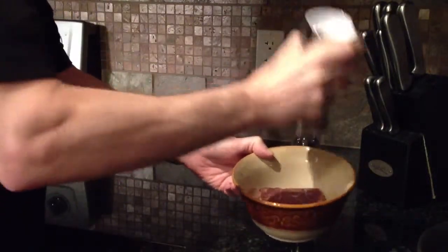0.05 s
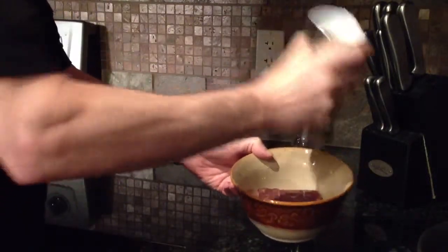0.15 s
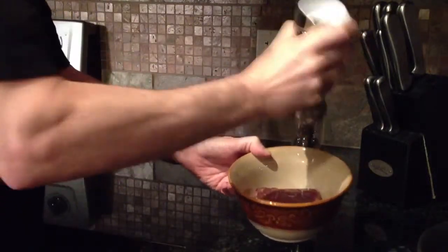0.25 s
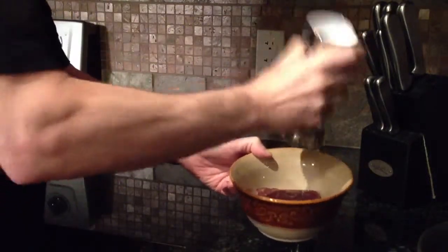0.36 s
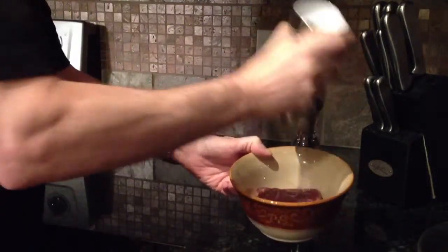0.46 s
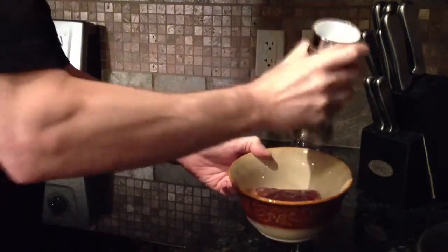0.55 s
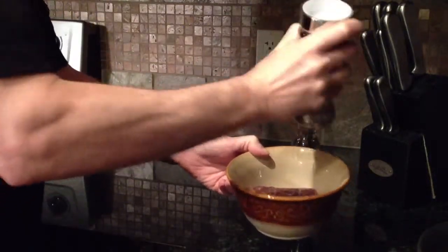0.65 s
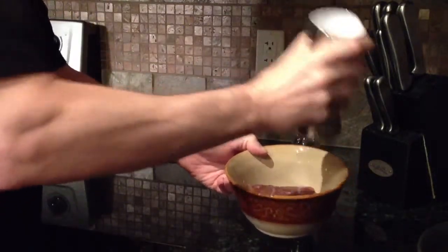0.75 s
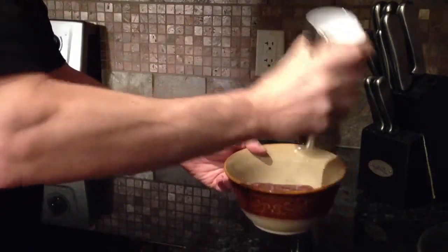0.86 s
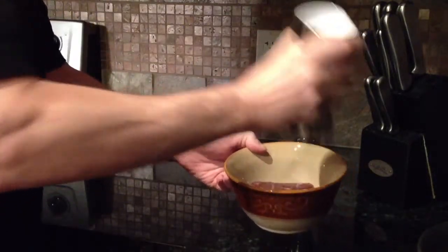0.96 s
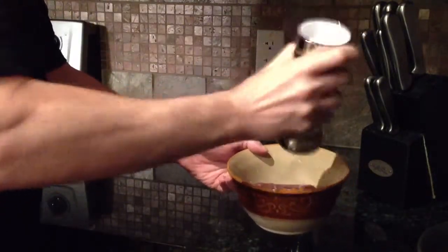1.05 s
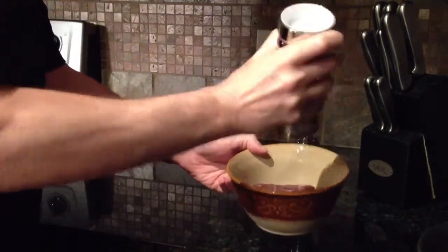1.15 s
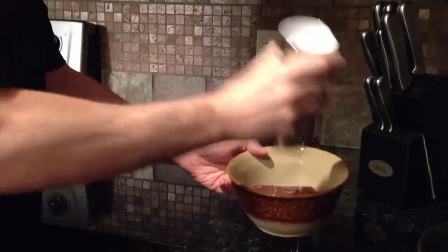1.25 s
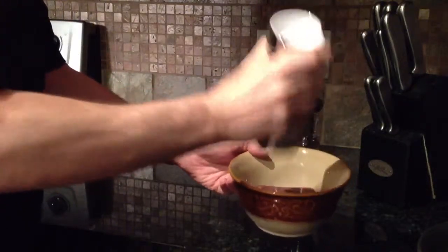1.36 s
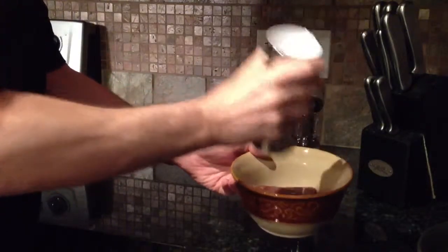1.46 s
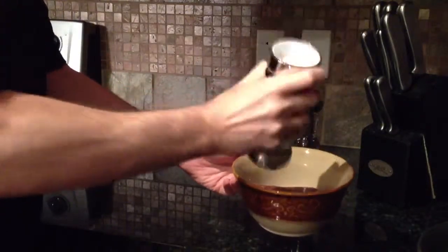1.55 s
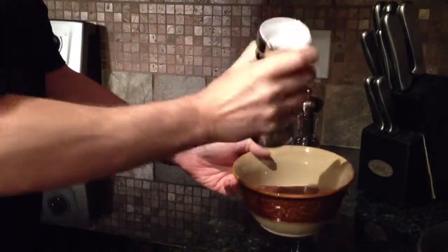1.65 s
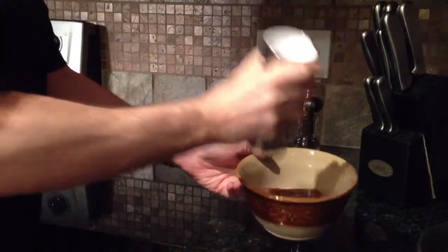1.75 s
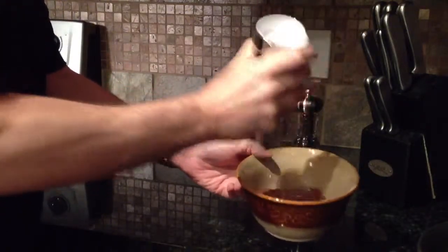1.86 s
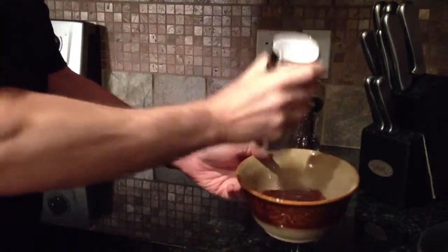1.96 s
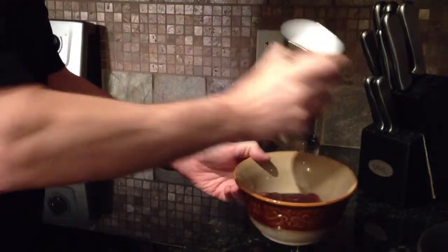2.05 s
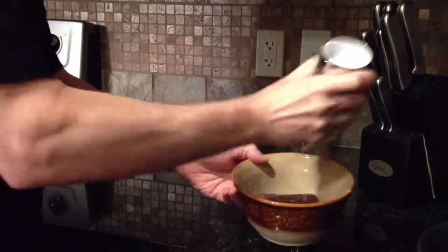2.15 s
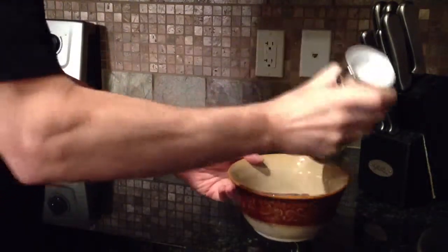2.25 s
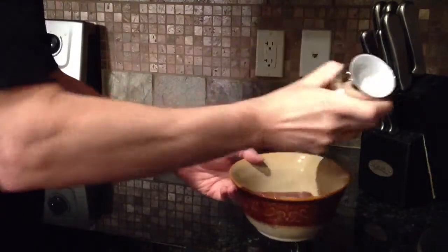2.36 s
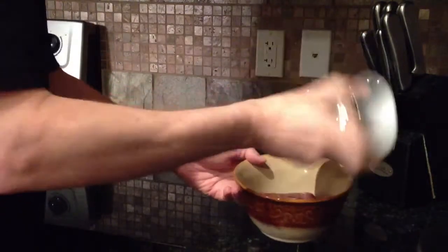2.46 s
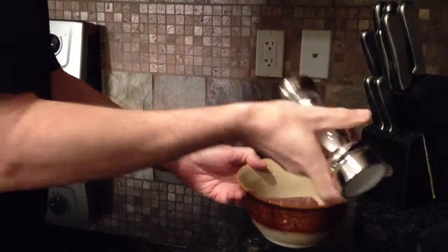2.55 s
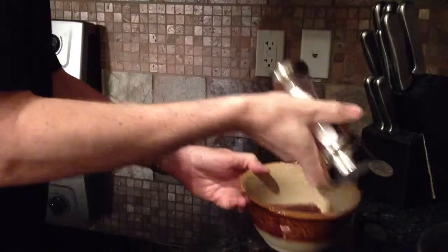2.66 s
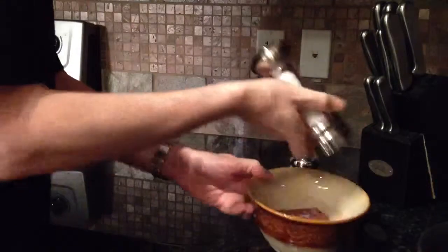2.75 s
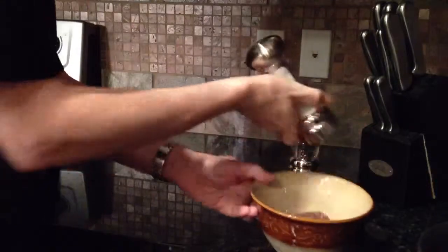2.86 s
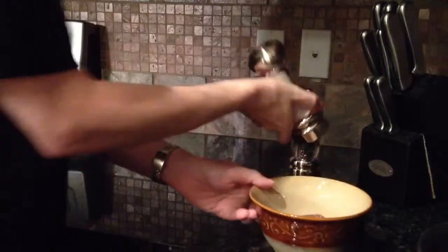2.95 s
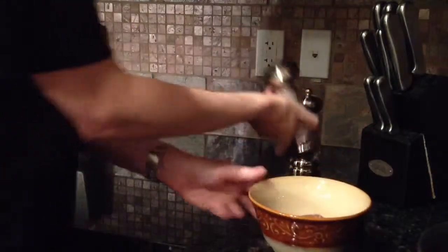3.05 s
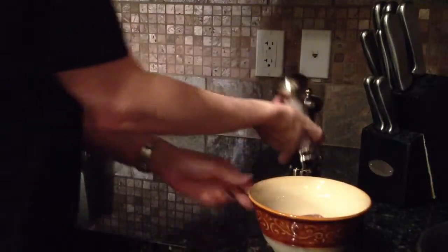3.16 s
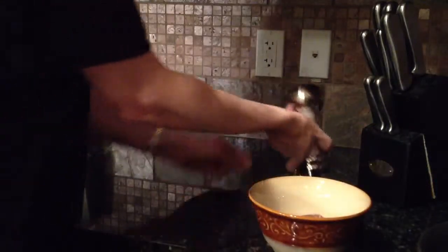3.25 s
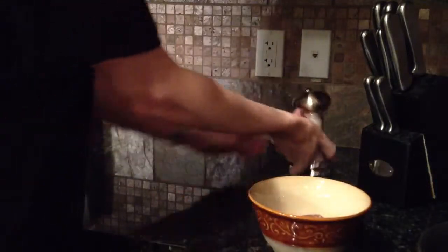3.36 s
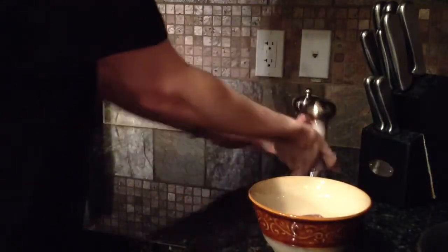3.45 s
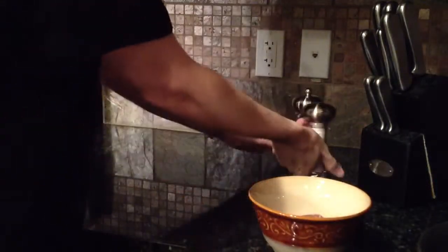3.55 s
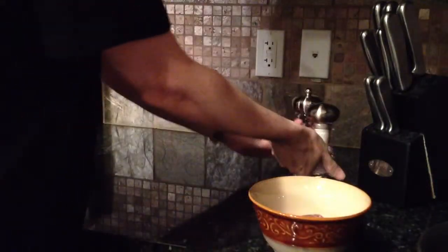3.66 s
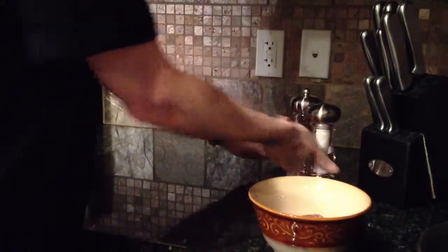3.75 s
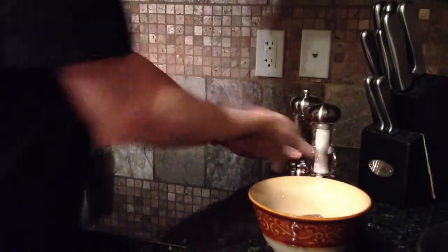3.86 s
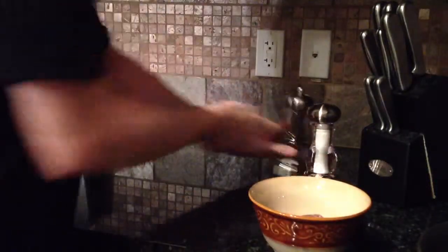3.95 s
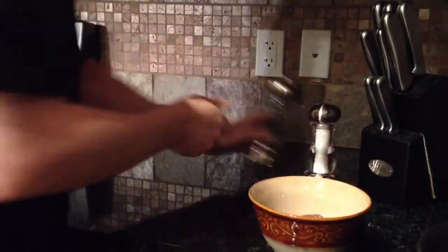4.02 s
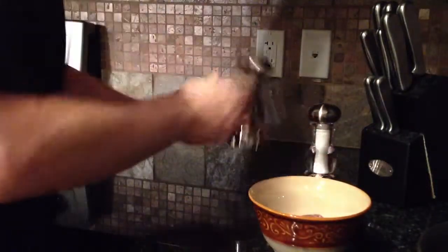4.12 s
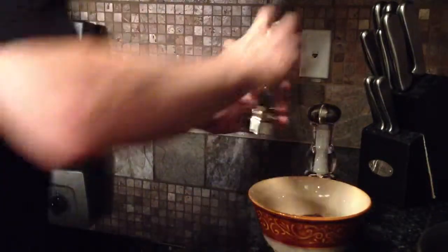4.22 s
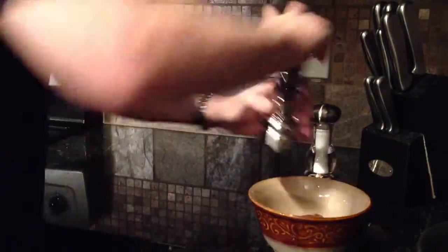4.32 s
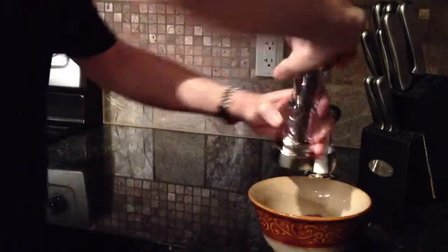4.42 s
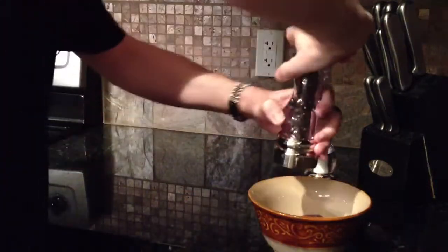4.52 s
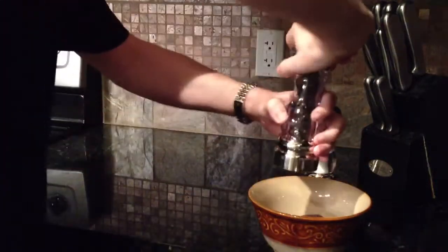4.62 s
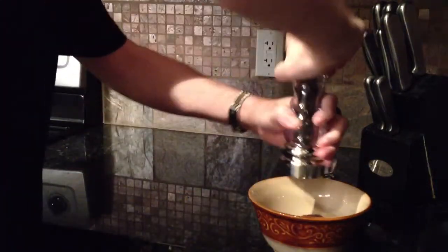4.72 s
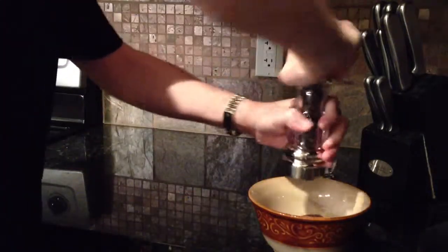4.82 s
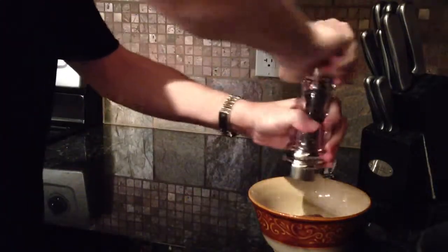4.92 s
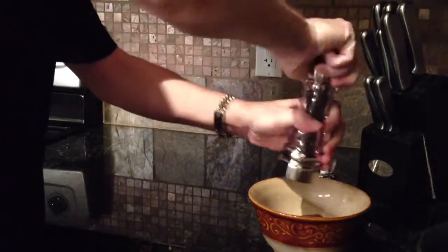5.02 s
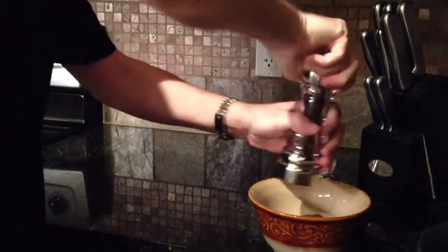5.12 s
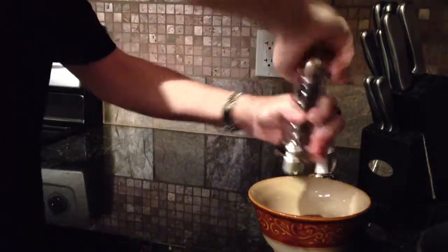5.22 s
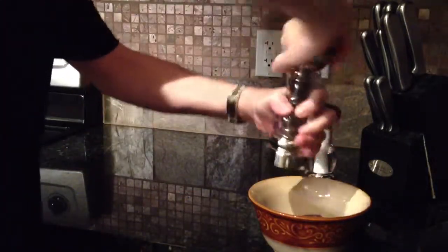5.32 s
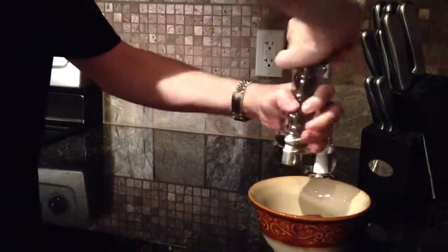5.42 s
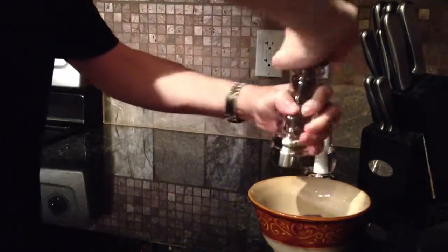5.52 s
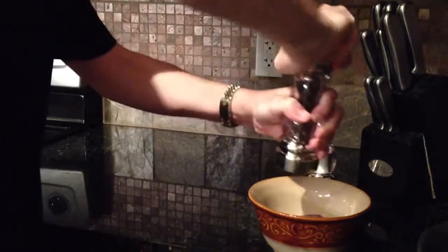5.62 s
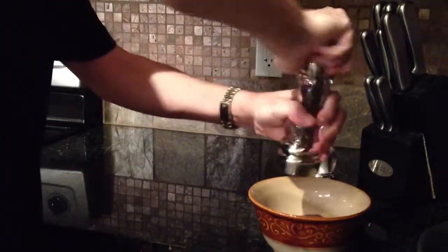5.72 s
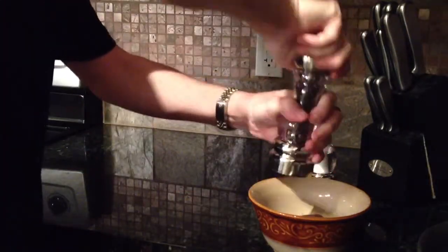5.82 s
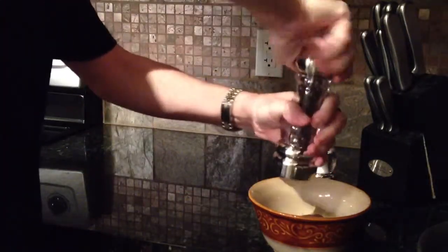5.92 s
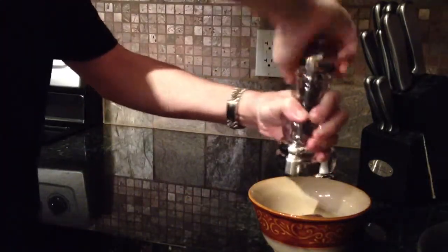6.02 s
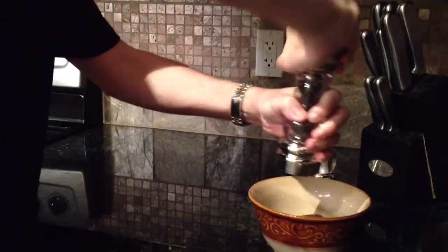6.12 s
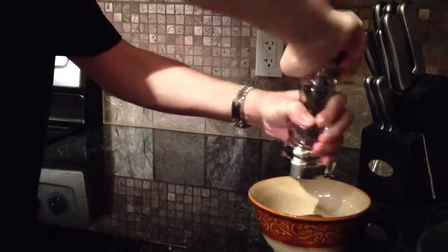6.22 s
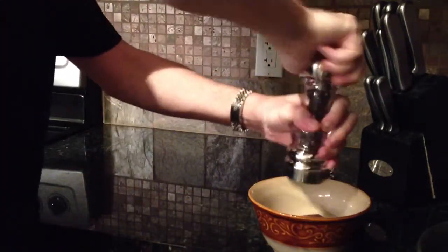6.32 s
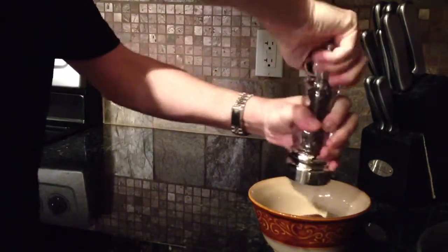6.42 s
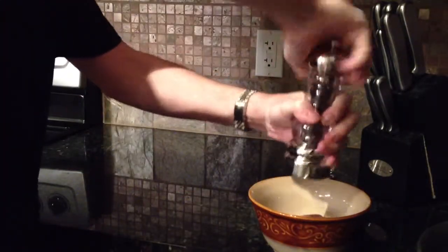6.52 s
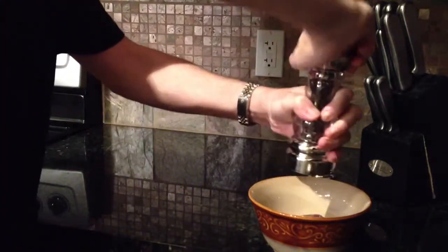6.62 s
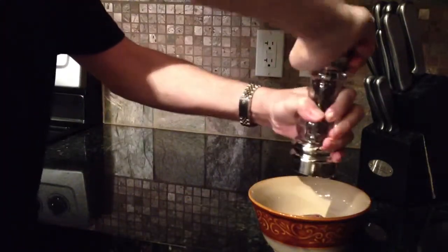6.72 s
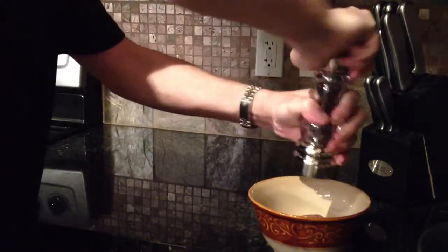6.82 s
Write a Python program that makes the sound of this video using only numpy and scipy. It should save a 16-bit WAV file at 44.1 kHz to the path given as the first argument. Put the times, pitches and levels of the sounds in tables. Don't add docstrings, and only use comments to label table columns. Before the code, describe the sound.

Very soft, quick, grainy salt shakes tick over a quiet kitchen hum. A stoneware bowl then lands loudly on a stone counter and rocks to rest, followed by a glass shaker's sharp double knock. Peppercorns slide faintly in a lifted mill, then four separate twists crunch and crack close to a small microphone, with bright tile reflections.

```python
import sys
import numpy as np
from scipy import signal
from scipy.fft import rfft, irfft
from scipy.io import wavfile
from scipy.ndimage import uniform_filter1d

SR = 44100
rng = np.random.default_rng(int(sys.argv[2]) if len(sys.argv) > 2 else 0)


def generate_wav(signal):
    frames = np.transpose(np.atleast_2d(signal))
    scaled = np.clip(frames, -1, 1) * 32767
    pcm = np.round(scaled).astype(np.int16)
    wavfile.write(sys.argv[1], SR, pcm)


def voltage_ratio(decibels):
    exponent = np.asarray(decibels, float) / 20
    return 10 ** exponent


N = 303408
TIME = np.arange(N) / SR

# (time [s], held [s], grinding level [dB], treble [dB])
TWISTS = [(4.778, .05, -63.5, -7), (4.846, 0.013, -50.5, -6), (4.945, 0.021, -51.5, -1.5),
          (5.01, 0.015, -53, -4.5), (5.52, 0.032, -71, -1), (5.6, 0.086, -54.5, -6.5),
          (5.68, 0.04, -49, -10.5), (5.751, 0.013, -51, -4), (6.22, .01, -61.5, -6),
          (6.249, 0.084, -44, -13.5), (6.314, 0.017, -41, -11), (6.75, .07, -54, -9.5),
          (6.844, 0.018, -37, -13), (6.87, .01, -44, -14)]
TWIST_RISE_DB_S, TWIST_FALL_DB_S = 592, 447.5
# (time [s], peak level [dB], main pitch [Hz], treble [dB], barrel thump [dB])
CRACKS = [(4.713, -60.5, 3170, -13, -10), (4.779, -54, 2300, -10, -10), (4.845, -44, 2190, -11, -4),
          (4.8752, -42.5, 2900, 11.5, -20), (4.9207, -24.5, 2690, 5.5, -17.5),
          (5.007, -42.5, 2130, 11, -20), (5.076, -56.5, 3100, 16.5, -21), (5.511, -60.5, 1830, 8.5, -19.5),
          (5.5644, -26.5, 2580, 7, -8.5), (5.674, -40, 2560, -11, -19), (5.7561, -42.5, 2190, -6, -3),
          (5.776, -53.5, 2500, 13, -1), (6.2326, -29, 2190, -24, -40), (6.323, -42, 2700, -3, -1),
          (6.7353, -34.5, 2470, -22.5, -38), (6.802, -48.5, 2500, -1, -16), (6.846, -31, 2190, -19.5, -23),
          (6.870, -31.5, 2050, -9, -22)]
CRUMBLE_MS = 3.5
# (frequency [Hz], width [Hz], level [dB])
MILL_RING = [(1160, 50, -29), (1630, 95, 38), (2070, 27, -11), (2190, 24, 47.5), (2840, 38, -20),
             (3020, 380, 29), (3950, 27, -3), (4500, 130, -30), (7170, 210, 13.5)]
# (frequency [Hz], density [dB per Hz])
GRIND_COLOUR = [(400, -44), (900, -5), (1400, -1.5), (2500, 1.5), (3500, -5), (4750, -3.5), (5500, -11),
                (7000, -7), (9650, -18), (12500, -15.5), (15500, -46)]
# (frequency [Hz], density [dB per Hz])
SNAP_COLOUR = [(2200, -20), (3300, -22), (4700, 1), (5600, -9), (7200, -5.5), (10000, -13), (15000, -8.5)]
# (time [s], slides on for [s], level [dB])
SLIDES = [
    (3.92, 0.032, -71.5),
    (4.04, 0.028, -62.5),
    (4.13, 0.13, -71),
    (4.322, 0.067, -61),
    (4.42, 0.055, -63.5),
    (4.713, 0.0029, -74),
]
SLIDE_RISE_DB_S, SLIDE_FALL_DB_S = 350, 330
# (frequency [Hz], density [dB per Hz])
CORN_COLOUR = [(880, -27), (1500, -17.5), (4100, -10.5), (4570, -8.5), (5890, -10.5), (6690, -3.5),
               (7670, -6), (8970, -18), (15500, -21)]

# (time [s], peak level [dB], contact [ms], rim ring [dB], foot chatter [dB])
BOWL_HITS = [
    (2.7296, -18, 0.43, -49, -29.5),
    (2.7305, -7, 0.21, -20.5, -24.5),
    (2.8202, -12, 0.37, -31.5, -25),
    (2.9235, -30.5, 0.5, -47, -29),
    (3.0325, -23, 0.57, -28.5, -31.5),
]
# (frequency [Hz], level [dB], t60 [s])
BOWL_MODES = [(147.4, -13.5, 0.17), (242, -9, 0.13), (440, -4, 0.09), (649.3, -20.5, 0.019),
              (760, -5, 0.041), (880, 0, 0.032), (970, -4.5, 0.038), (1046, -7.5, 0.027), (1117, 0, 0.048),
              (1236, -2, 0.12), (1440, -16, 0.064), (1700, -26.5, 0.036), (2170, -14.5, .04)]
# (frequency [Hz], level [dB], t60 [s])
BOWL_RIM = [(2464, 0.5, 0.26), (4400, -17, 0.06), (8060, -11, 0.038), (9220, -22.5, .04),
            (11300, -20.5, .03), (11900, -23.5, .04), (14700, -27, .03)]
# (frequency [Hz], density [dB per Hz])
BOWL_KNOCK = [(60, -28), (150, -18), (450, -17.5), (800, 5), (1450, -3.5), (2600, -14), (3600, -29.5),
              (5300, -31.5), (8100, -37), (12000, -49), (16000, -44)]
# (time [s], peak level [dB], contact [ms], cap ring [dB], foot chatter [dB])
SHAKER_HITS = [
    (3.4955, -22.5, 0.16, -13.5, -5.5),
    (3.4975, -9, 0.43, -34, -11.5),
    (3.5015, -28, 0.43, 2, -15),
    (3.5095, -14.5, 0.67, -21, -15.5),
    (3.5235, -38, 0.75, -23, -36),
]
# (frequency [Hz], level [dB], t60 [s])
SHAKER_MODES = [(173.9, -11.5, 0.081), (185.2, -7.5, 0.032), (289, -6.5, 0.057), (418.5, -9, 0.073),
                (542, -2, 0.024), (651, -2.5, 0.037), (857, -7, 0.016), (1164, -2, 0.027),
                (1268, -3.5, 0.013)]
# (frequency [Hz], level [dB], t60 [s])
SHAKER_CAP = [(4300, 0, .012), (5700, -4, .01)]
# (frequency [Hz], density [dB per Hz])
SHAKER_KNOCK = [(60, -20), (300, -12.5), (550, -1), (800, -6.5), (1400, -9), (2800, -13.5), (4200, -7),
                (5100, -13.5), (6000, -13.5), (9900, -31.5), (16000, -35)]

# (time [s], pours on for [s], level [dB])
SHAKES = [(0.022, 0.0037, -58), (0.17, 0.055, -65), (0.35, .003, -62.5), (0.385, 0.02, -63),
          (0.53, .003, -63), (0.595, 0.0026, -65), (0.72, 0.047, -70.5), (0.885, .025, -63.5),
          (1.04, .003, -62), (1.075, 0.017, -65), (1.22, .003, -65), (1.245, 0.0041, -63),
          (1.39, .003, -65), (1.42, 0.0042, -62), (1.58, .006, -63.5), (1.755, 0.0044, -61.5),
          (1.89, .003, -64), (1.93, 0.0069, -62.5), (2.283, 0.013, -65.5), (2.53, 0.0043, -66),
          (2.65, 0.031, -71)]
SHAKE_RISE_DB_S, SHAKE_FALL_DB_S = 299.5, 330
# (frequency [Hz], width [Hz], level [dB])
SHAKER_RING = [(2160, 170.4, 5.5), (3407, 61, -33.5), (4760, 16, -8), (5270, 20, -4), (7600, 160, -7),
               (7950, 12, -8)]
# (frequency [Hz], density [dB per Hz])
SALT_COLOUR = [(880, -25), (1500, -25.5), (2200, -6.5), (2420, -5.5), (6130, -7.5), (7300, -3.5),
               (10200, -10.5), (15500, -8.5)]
# (time [s], peak level [dB], pitch [Hz])
PINGS = [(0.179, -55, 5270), (0.392, -59, 7600), (1.0321, -58, 5200), (1.4194, -74, 7300),
         (1.8836, -62, 5220), (2.258, -56, 5240), (2.5277, -57.5, 5170), (3.414, -56.5, 8600),
         (6.636, -58, 8120), (0.53, -60, 5300), (1.225, -61, 5430)]

# (delay [ms], level [dB])
ECHOES = [
    (3.6, -3),
    (5.8, 0),
    (9.5, -12),
    (13, -14),
]
# (frequency [Hz], t60 [s])
ROOM_T60 = [(100, 0.41), (400, 0.64), (1200, 0.58), (3500, 0.54), (9000, 0.46)]
# (frequency [Hz], width [Hz], level [dB])
DRONE = [(112, 2.9, 5), (234, 24, -6), (330.1, 14, -5), (415, 33, -8), (601.6, 6.9, -7)]
# (time [s], held [s], level [dB])
COMPRESSOR = [(0.4, 0.35, -76.5), (1.05, 0.55, -72.5), (2.6, .3, -72), (3.6, 0.057, -69),
              (4.25, 0.089, -77), (5.05, 0.49, -74.5), (6.3, .2, -77.5)]
COMPRESSOR_HZ, SWELL_DB_S = 173.3, 26
# (frequency [Hz], density [dB per Hz])
AIR_COLOUR = [(25, -39.5), (75, -22.5), (100, -12), (140, -4), (300, -12.5), (450, -9), (800, -17),
              (1050, -12), (1450, -19), (3400, -23), (7000, -24.5), (10000, -28), (15000, -23)]
AIR_DB = -65
# (frequency [Hz], level [dB])
MICROPHONE = [(100, 0), (7500, 2), (10000, -5), (13000, 0), (15000, -2.5)]
TOP_HZ = 15350


def mill():
    high_pass = signal.butter(4, 950, "high", fs=SR, output="sos")
    return signal.sosfilt(high_pass, grinding() + cracking())


def grinding():
    load = uniform_filter1d(np.repeat(rng.standard_normal(N // 300 + 1), 300)[:N], 200)
    crush = grains(5000, 2) * voltage_ratio(2.5 * load)
    barrel = unit(unit(colour(crush, GRIND_COLOUR)) + voltage_ratio(-11.5) * resonate(crush, MILL_RING))
    low = signal.sosfilt(signal.butter(2, 3700, fs=SR, output="sos"), barrel)
    high = barrel - low
    push = gain(TWISTS, TWIST_RISE_DB_S, TWIST_FALL_DB_S)
    treble_db = np.array(TWISTS)[:, 3:]
    return voltage_ratio(-4.5) * push.max(0) * low + voltage_ratio(7.5) * (push * voltage_ratio(treble_db)).max(0) * high


def cracking():
    out, t = np.zeros(N), TIME[:SR // 10]
    splinters = rng.standard_normal((len(CRACKS), len(t)))
    for (s, db, hz, treble_db, thump_db), shower in zip(CRACKS, splinters):
        shower = shower * np.exp(-t / CRUMBLE_MS * 1000)
        shower[0] = 4
        corn = [(hz, 1100, 0)]
        body = resonate(resonate(shower, corn), corn)
        body += voltage_ratio(-10.5) * unit(colour(shower, GRIND_COLOUR))
        body += voltage_ratio(-6) * resonate(shower, MILL_RING)
        snap = crest(colour(shower, SNAP_COLOUR))
        thump = crest(resonate(shower, [(1316, 120, 0.5)]))
        burst = crest(body) + voltage_ratio(treble_db - 2) * snap + voltage_ratio(thump_db) * thump
        i = int(s * SR)
        out[i:i + len(t)] += voltage_ratio(db + 3) * burst[:N - i]
    return out


def sliding_corns():
    motion = gain(SLIDES, SLIDE_RISE_DB_S, SLIDE_FALL_DB_S)
    return rattle(motion, CORN_COLOUR, MILL_RING, rate=3000, spread_db=2.5, ring_db=-21)


def bowl():
    return set_down(BOWL_HITS, BOWL_MODES, BOWL_RIM, BOWL_KNOCK, knock_db=9.7, scrape_ms=1.3)


def shaker():
    return set_down(SHAKER_HITS, SHAKER_MODES, SHAKER_CAP, SHAKER_KNOCK, knock_db=9.9, scrape_ms=1.58)


def set_down(hits, modes, free_modes, knock, knock_db, scrape_ms):
    tap = np.zeros(SR // 2)
    tap[0] = 1
    body = crest(ring(tap, modes)) + voltage_ratio(knock_db) * crest(colour(tap, knock))
    force, edge, chatter = np.zeros(N), np.zeros(N), rng.standard_normal(N)
    spots_db = 3 * rng.standard_normal((len(hits), len(free_modes)))
    spots_db[:, 0] = 0
    for (s, db, contact_ms, edge_db, scrape_db), spot_db in zip(hits, spots_db):
        since_ms = (TIME - s) * 1000
        push = np.exp(-8 * (since_ms / max(contact_ms, 0.02)) ** 2)
        scrape = (since_ms > 0) * np.exp(-np.abs(since_ms) / scrape_ms) * chatter
        force += voltage_ratio(db) * (push / push.sum() + voltage_ratio(scrape_db) * scrape)
        struck = [(hz, d + e, t60) for (hz, d, t60), e in zip(free_modes, spot_db)]
        i = int(s * SR)
        edge[i:i + len(tap)] += voltage_ratio(db + edge_db) * ring(tap, struck)
    return signal.fftconvolve(force, body)[:N] + edge


def shaken_salt():
    motion = gain(SHAKES, SHAKE_RISE_DB_S, SHAKE_FALL_DB_S)
    return rattle(motion, SALT_COLOUR, SHAKER_RING, rate=3000, spread_db=3, ring_db=-7.5)


def bright_ticks():
    out, t = np.zeros(N), TIME[:SR // 10]
    for s, db, hz in PINGS:
        i = int(s * SR)
        out[i:i + len(t)] += voltage_ratio(db - 9) * np.sin(2 * np.pi * hz * t) * np.exp(-t / 0.011)
    return out


def kitchen(x, wet_db, echo_db):
    t = TIME[:SR]
    hz, t60 = np.transpose(ROOM_T60)
    tail = 0
    for centre in 80 * 2 ** np.arange(0, 8, 0.5):
        edges = centre * 2 ** np.array([-0.25, 0.25])
        band = signal.butter(2, edges, "band", fs=SR, output="sos")
        decay = voltage_ratio(-60 * t / np.interp(np.log(centre), np.log(hz), t60))
        tail = tail + signal.sosfilt(band, rng.standard_normal(len(t))) * decay
    tail = tail * (np.exp(-t / 0.025) + voltage_ratio(-2))
    response = voltage_ratio(wet_db) * tail * np.clip(t / 0.0021, 0, 1) / np.sqrt(np.sum(tail ** 2))
    response[0] = 1
    for ms, db in ECHOES:
        response[int(ms * SR / 1000)] += voltage_ratio(db + echo_db)
    return signal.fftconvolve(x, response)[:N]


def air():
    swell = uniform_filter1d(np.repeat(rng.standard_normal(N // 6000 + 1), 6000)[:N], 6000)
    drone = resonate(rng.standard_normal(N), DRONE) * voltage_ratio(2 * swell)
    note = resonate(rng.standard_normal(N), [(COMPRESSOR_HZ, 12, 0)])
    note = note * gain(COMPRESSOR, SWELL_DB_S, SWELL_DB_S).max(0)
    hiss = unit(colour(rng.standard_normal(N), AIR_COLOUR))
    return voltage_ratio(AIR_DB) * (voltage_ratio(-2.5) * hiss + voltage_ratio(-4) * drone) + voltage_ratio(3.5) * note


def rattle(motion, spectrum, peaks, rate, spread_db, ring_db):
    ticks = grains(rate, spread_db)
    wall = voltage_ratio(ring_db) * resonate(ticks, peaks)
    return motion.max(0) * unit(unit(colour(ticks, spectrum)) + wall)


def grains(rate, spread_db):
    hit = rng.random(N) < rate / SR
    size = rng.exponential(size=N)
    sign = rng.standard_normal(N)
    return unit(hit * voltage_ratio(spread_db * np.minimum(size, 3)) * sign)


def gain(strokes, rise_db_s, fall_db_s):
    s, held, db = np.array(strokes).T[:3, :, None]
    rise = rise_db_s * np.maximum(s - TIME, 0)
    fall = fall_db_s * np.maximum(TIME - s - held, 0)
    return voltage_ratio(db - rise - fall)


def ring(x, modes):
    t = TIME[:SR // 2]
    body = np.zeros(len(t))
    for k, (hz, db, t60) in enumerate(modes):
        body += (-1) ** k * voltage_ratio(db) * np.sin(2 * np.pi * hz * t) * voltage_ratio(-60 * t / t60)
    return signal.fftconvolve(x, body)[:len(x)]


def resonate(x, peaks):
    modes = [(hz, db + 20 * np.log10(w), np.log(1000) / np.pi / w) for hz, w, db in peaks]
    return unit(ring(x, modes))


def colour(x, points):
    hz, db = np.transpose(points)
    grid = np.arange(2049) * SR / 4096 + 1
    cepstrum = irfft(np.log(voltage_ratio(np.interp(np.log(grid), np.log(hz), db))))
    cepstrum[1:2048] *= 2
    response = irfft(np.exp(rfft(cepstrum[:2049], 4096)))
    return signal.fftconvolve(x, response)[:len(x)]


def unit(x):
    return x / np.sqrt(np.mean(x ** 2))


def crest(x):
    return x / np.abs(x).max()


def scene():
    salt = voltage_ratio(-2) * shaken_salt() + bright_ticks()
    corns = voltage_ratio(-3) * sliding_corns()
    bowl_down = kitchen(voltage_ratio(-7) * bowl(), wet_db=-2, echo_db=-0.1)
    shaker_down = kitchen(voltage_ratio(-9.5) * shaker(), wet_db=-2, echo_db=-11)
    held = kitchen(salt + corns + voltage_ratio(-2.5) * mill(), wet_db=-5.5, echo_db=-19)
    return (bowl_down + shaker_down + held + air())[None]


def roll_off(x):
    return signal.sosfilt(signal.butter(12, 16460, fs=SR, output="sos"), x)


def record(dry):
    x = colour(dry[0], MICROPHONE)
    x = signal.sosfilt(signal.butter(4, 85, "high", fs=SR, output="sos"), x)
    x = signal.sosfilt(signal.ellip(8, 0.2, 30, TOP_HZ, fs=SR, output="sos"), x)
    return roll_off(x[None])


dry = scene()
out = record(dry)
generate_wav(out)
```